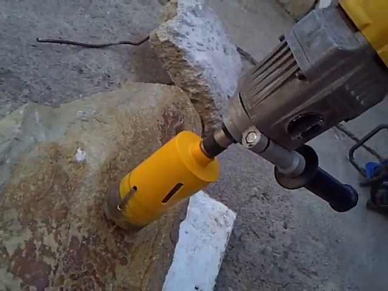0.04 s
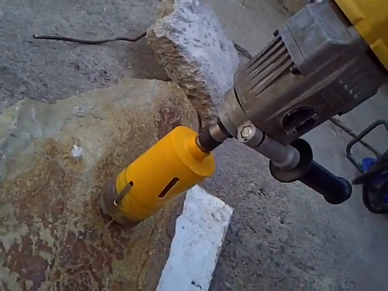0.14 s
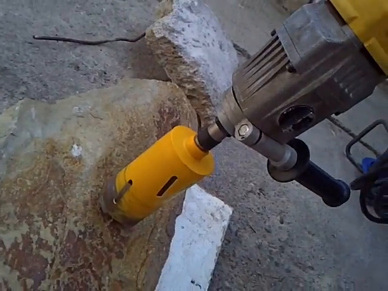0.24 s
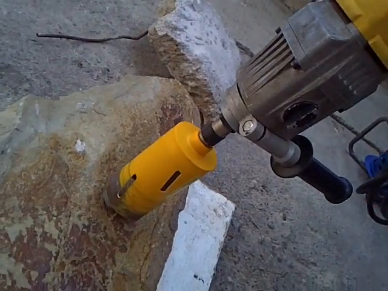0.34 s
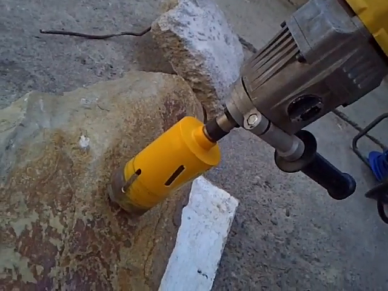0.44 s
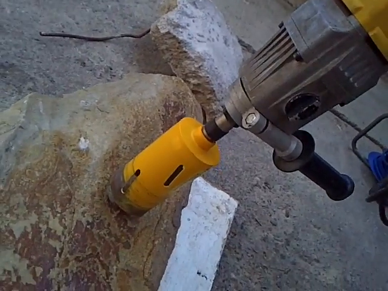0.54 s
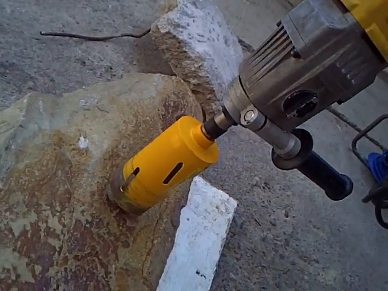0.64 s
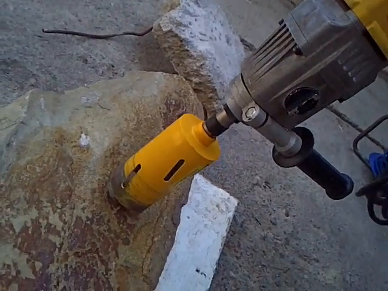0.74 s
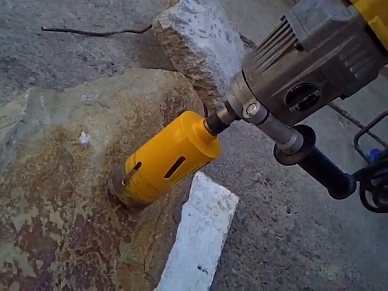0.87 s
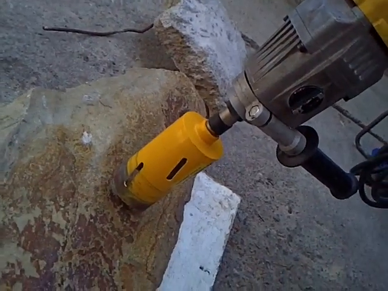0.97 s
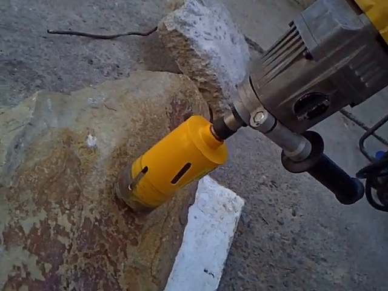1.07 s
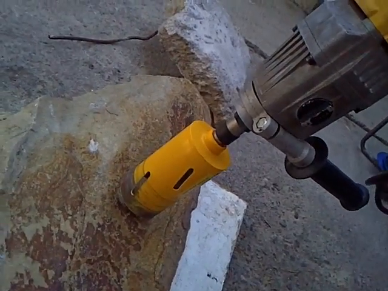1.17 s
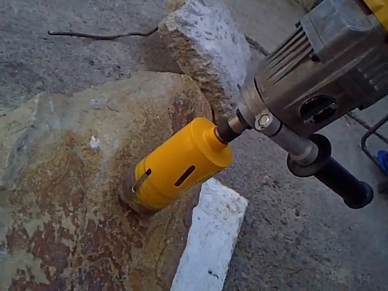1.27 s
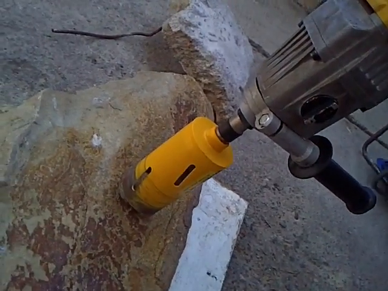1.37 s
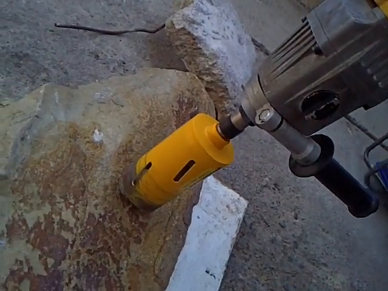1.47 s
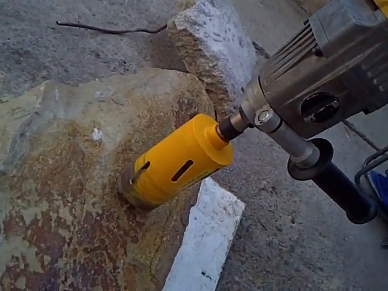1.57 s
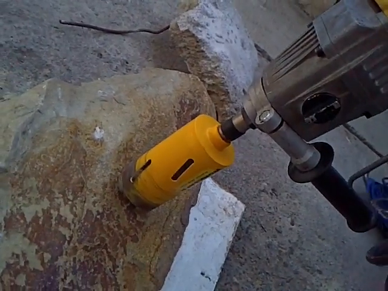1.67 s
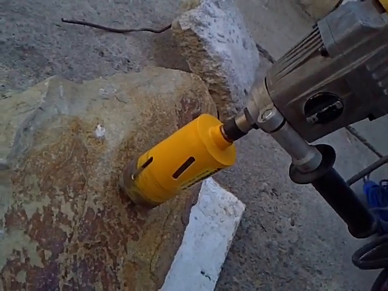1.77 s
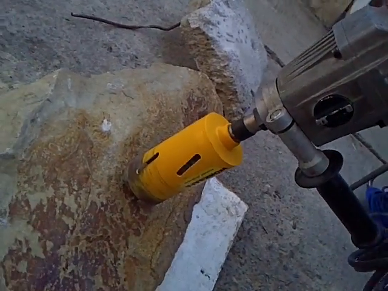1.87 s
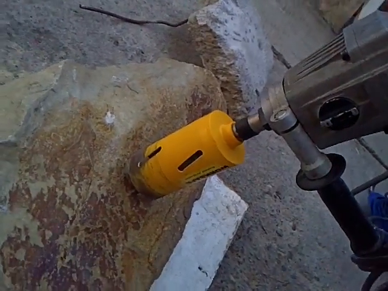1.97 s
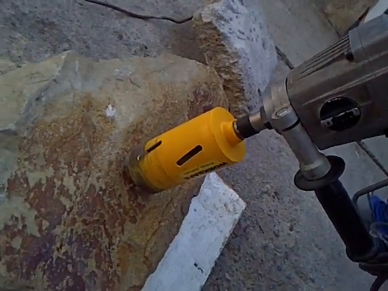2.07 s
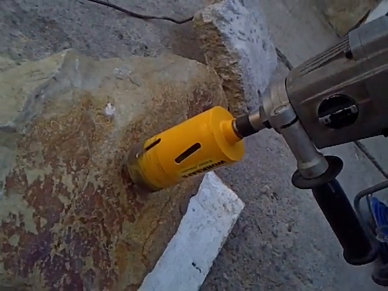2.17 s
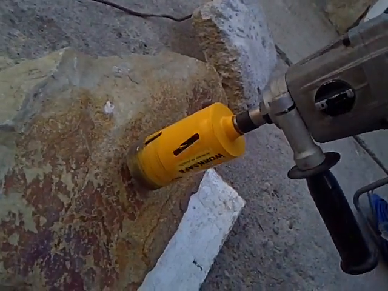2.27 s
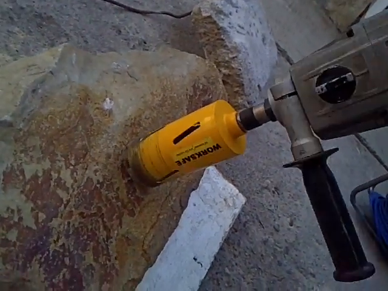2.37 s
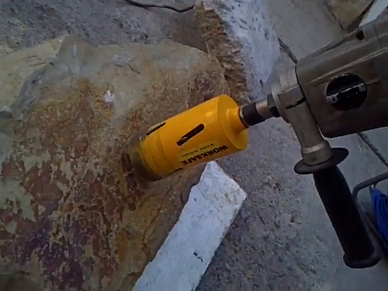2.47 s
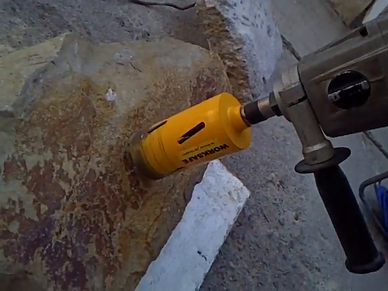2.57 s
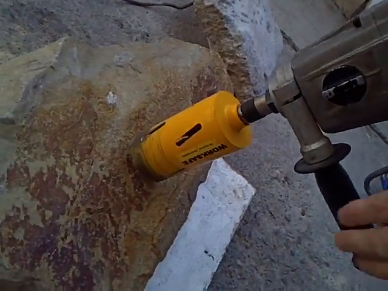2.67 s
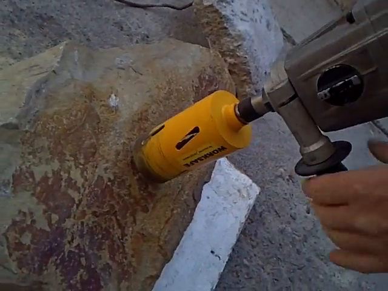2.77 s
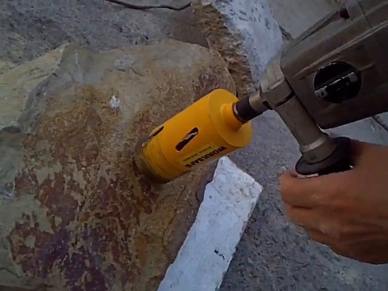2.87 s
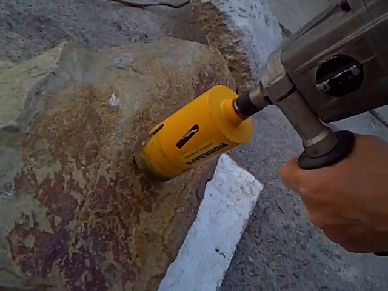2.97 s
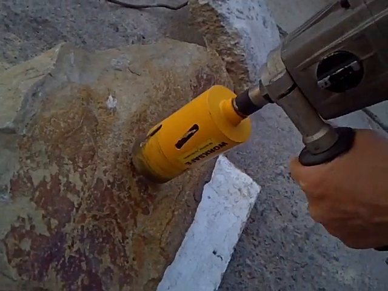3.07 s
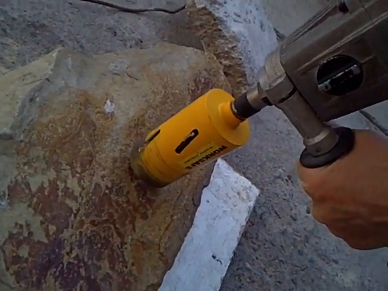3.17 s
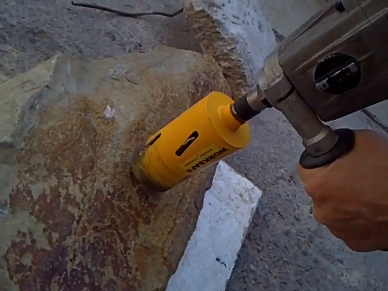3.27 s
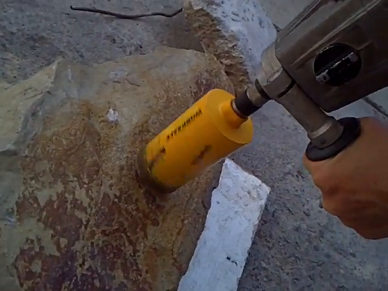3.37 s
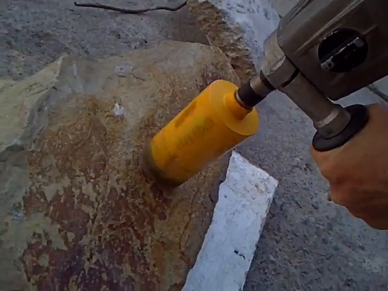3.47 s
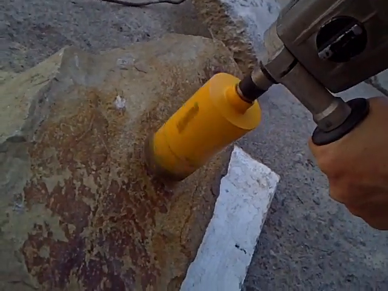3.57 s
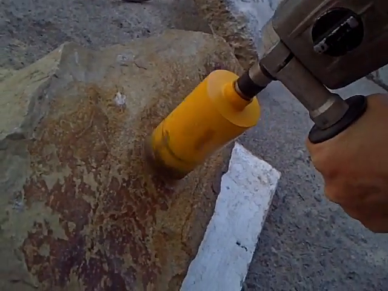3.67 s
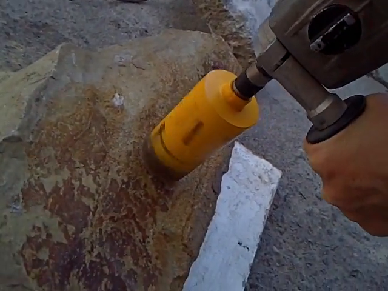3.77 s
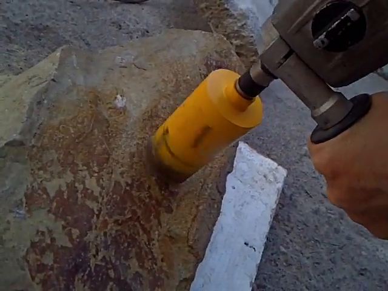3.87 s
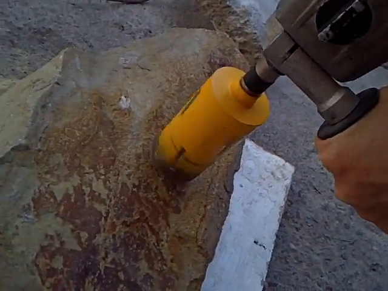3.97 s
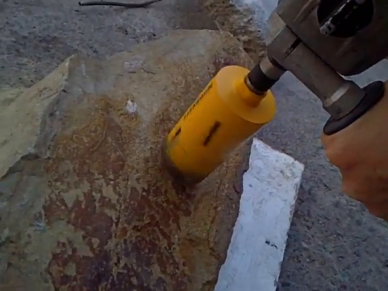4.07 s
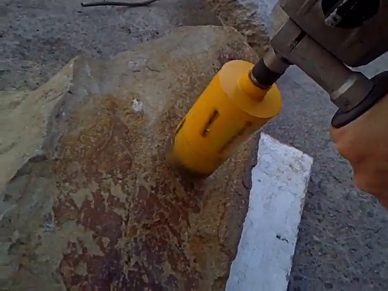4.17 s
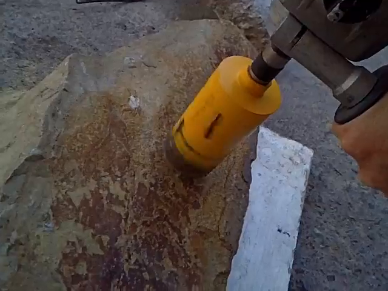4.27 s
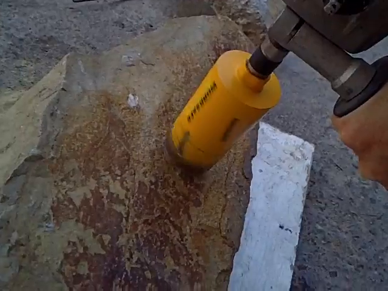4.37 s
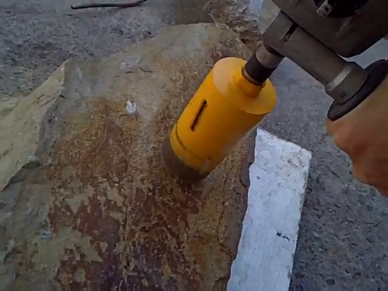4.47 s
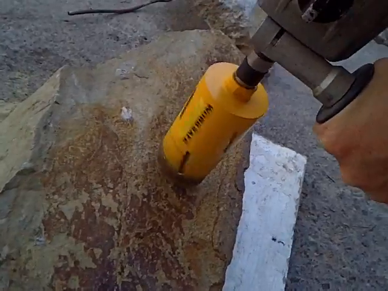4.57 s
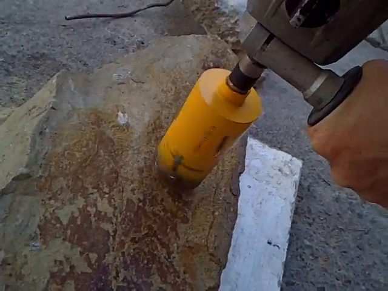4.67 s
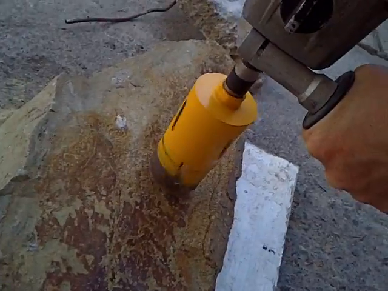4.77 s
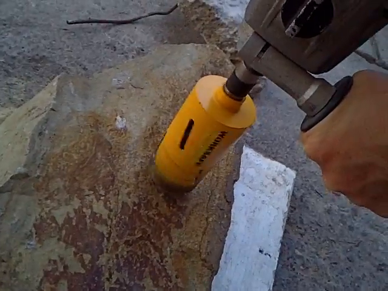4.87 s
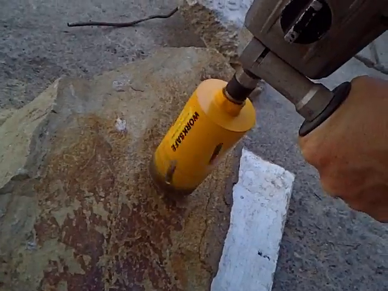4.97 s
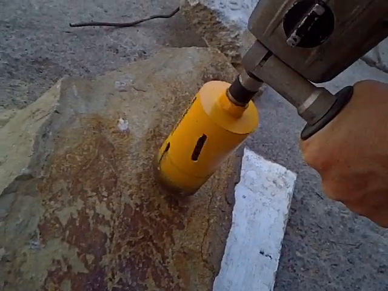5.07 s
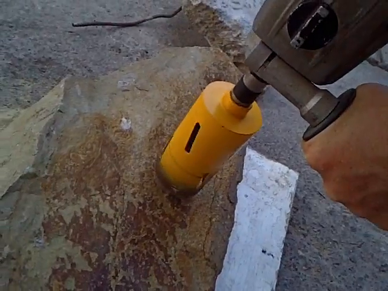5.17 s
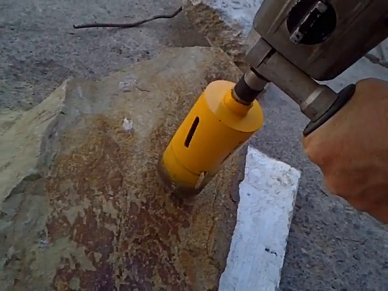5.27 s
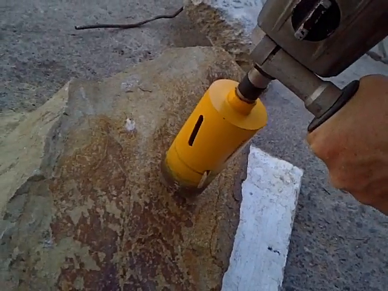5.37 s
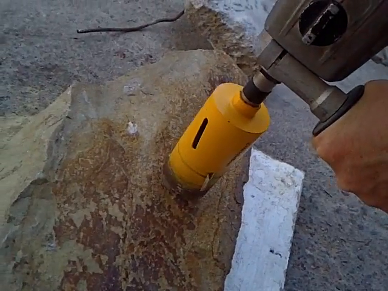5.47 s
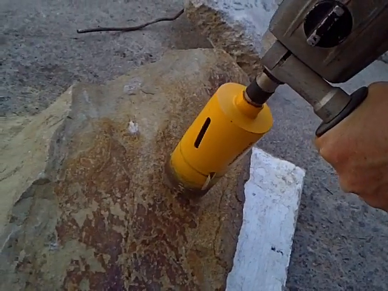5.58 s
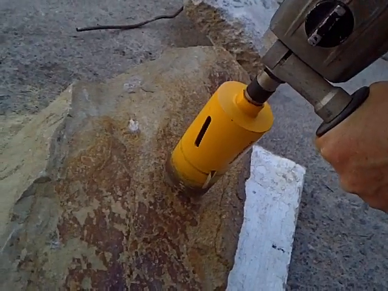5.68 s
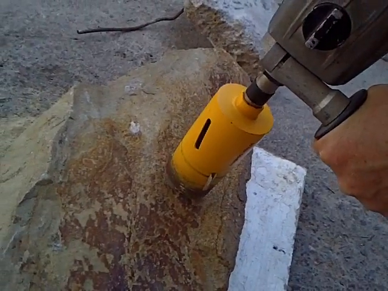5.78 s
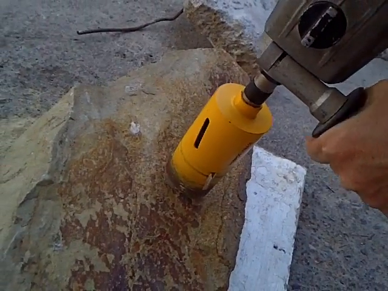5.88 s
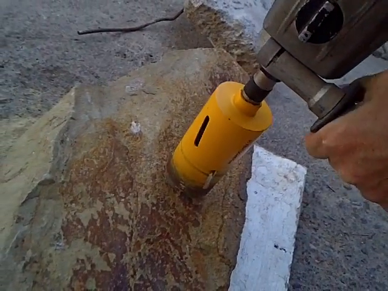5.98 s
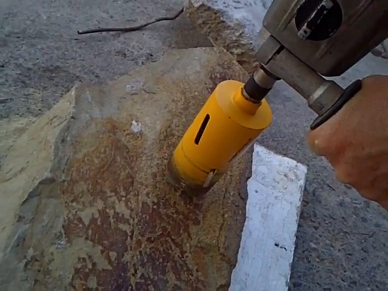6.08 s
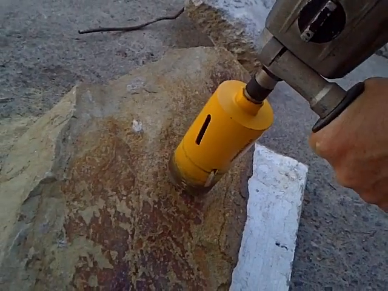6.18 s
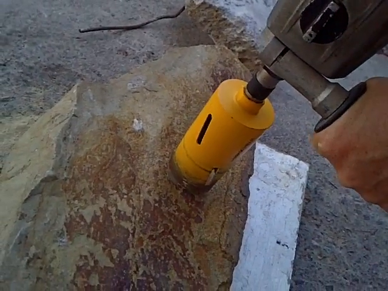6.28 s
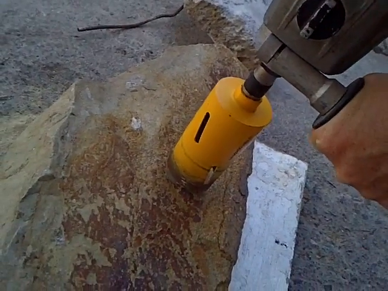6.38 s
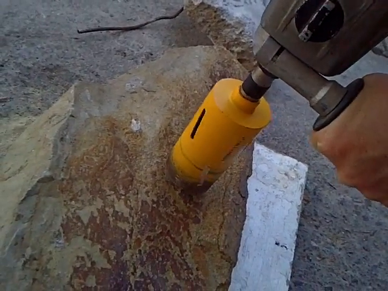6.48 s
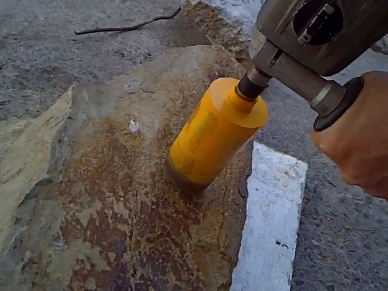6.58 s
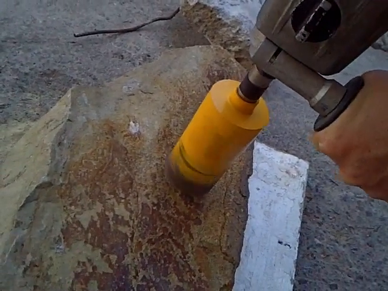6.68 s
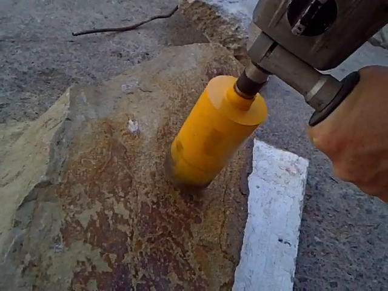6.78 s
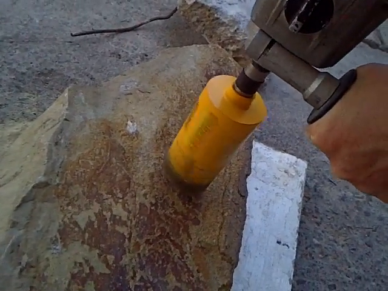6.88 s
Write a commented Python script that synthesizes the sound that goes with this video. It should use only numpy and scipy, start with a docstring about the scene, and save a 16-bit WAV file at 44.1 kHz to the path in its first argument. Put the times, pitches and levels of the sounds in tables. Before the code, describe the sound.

A soft outdoor hush lies behind close, dry sounds with short reflections from yard walls. Gritty scraping starts at once; from 0.25 to 0.4 seconds a heavy drill lands with a rapid cluster of dull, hollow knocks, with weaker thuds until about 1.1. From 1.3 the steel crown scrapes and ticks on stone; near 1.77 it gives a very loud, brief squawking judder and crunch that overloads the microphone. Small scrapes and ticks continue to 3.4. At 3.44 the motor kicks in with hard, buzzing pulses and races upward until 3.6, then coasts: chattering gears, a throbbing rattle and a wavering whine fall steadily, slowing into loose clacks around 4.9 to 5.15. Quiet air follows, with a very faint high whistle and tiny ticks. At 6.56 a second burst revs up slightly higher, released at 6.75, still whirring and falling at the end.

```python
"""A walled yard: a core drill is set on a boulder with dull knocks; its steel crown scrapes and judders on the stone.
Two trigger blips: mains half-waves kick the motor up to speed, then friction and drag slow it.
Gears rattle and throb once a shaft turn under a whine that falls with the rotor speed.
Grit noise, resonators and speed-locked sines make the sounds; the close microphone overloads on the peaks."""
import sys
import numpy as np
from scipy import signal
from scipy.fft import rfft, irfft, next_fast_len
from scipy.io import wavfile
from scipy.ndimage import uniform_filter1d

SR = 44100
rng = np.random.default_rng(int(sys.argv[2]) if len(sys.argv) > 2 else 0)


def pcm_store(signal):
    """Save signal as 16-bit PCM."""
    levels = np.round(np.clip(np.atleast_2d(signal), -1, 1) * 32767)
    wavfile.write(sys.argv[1], SR, levels.astype(np.int16).T)


N = 305613
T = np.arange(N) / SR
SIZE = next_fast_len(N + SR // 2) // 2 * 2
FREQ_HZ = np.maximum(np.fft.rfftfreq(SIZE, 1 / SR), 1)

# outdoor noise outline: f/Hz, relative level/dB
YARD_COLOUR = [(25, -33.5), (60, -16.5), (150, -6.5), (320, -7.5), (560, -7.5), (750, -10.5), (1200, -13.5),
               (2200, -16), (3500, -26.5), (4400, -21), (4900, -40.5), (7300, -38), (8500, -51),
               (15000, -65.5)]
# slow change of outdoor noise: t/s, relative level/dB
YARD_SWELL = [(0, 3), (2.1, 0), (3.4, 1.5), (5.5, -2.5), (6.2, 1)]
# faint distant whistle: t/s, level/dB
WHISTLE_LEVEL = [(0, -59), (3.4, -72), (5.4, -52.5), (5.9, -56.5), (6.5, -57.5)]
# dull knocks as the drill is shifted: t/s, peak level/dB, modes above 450 Hz against bass/dB
KNOCKS = [(0.254, -9, 4), (0.274, -10, -1), (0.291, -19, 3), (0.309, -16, 1), (0.333, -7.5, 3),
          (0.355, -19, -5), (0.39, -20, -3), (0.478, -32, -7), (0.605, -33, -4), (0.670, -17, 0),
          (0.704, -23, 0), (0.884, -26, -4), (1.11, -31, -7), (1.135, -30, -9)]
# body modes under a knock: f/Hz, width/Hz, relative level/dB
KNOCK_MODES = [(102, 27, -4.5), (155.5, 6.2, 12), (189, 17, 2.5), (245, 77, -4), (346.5, 16.6, 7.5),
               (385, 17, 0.5), (524, 26, 3), (650, 26, -6.5), (770, 92, -14), (1050, 51, -9),
               (1500, 1300, -22)]
# crown scrapes on stone: start t/s, length/s, level/dB, rumble against level/dB, relative grit/dB
SCRAPES = [(0.0, 0.28, -37.5, -24, -0.5), (0.127, 0.029, -35, -27, -26), (1.289, 0.017, -37.5, -5.5, -14),
           (1.392, 0.022, -52.5, 12.5, -24), (1.425, .022, -42.5, 5.5, -18), (1.48, 0.11, -42.5, 2, -8),
           (1.577, 0.23, -30.5, -3, -15), (1.592, 0.0094, -38.5, 9.5, -19), (1.795, 0.05, -38, 3.5, -29),
           (1.894, 0.046, -46.5, -1.5, -14), (2.123, 0.051, -38.5, -29, 1.5),
           (2.192, 0.085, -32.5, -6, -16), (2.291, 0.067, -36.5, -10, -5), (2.376, 0.21, -42.5, -4, -4.5),
           (2.648, 0.039, -33.5, -12, -12), (2.91, .05, -35, -12, -2.5), (3.071, .075, -42, -34, 8),
           (3.179, 0.024, -23.5, -32, 0.5), (3.25, .06, -46.5, -13, 7.5), (3.422, 0.018, -38, -24, -3),
           (6.534, 0.028, -35, -13, -13)]
# scrape outline: f/Hz, relative level/dB
SCRAPE_COLOUR = [(40, -49.5), (100, -24.5), (230, -2.5), (500, 3.5), (1050, -2.5), (2100, -7.5), (3200, -8),
                 (4200, -15.5), (4900, -35.5), (7500, -31.5), (9000, -49), (15000, -41)]
# rings of the steel crown on stone: f/Hz, width/Hz, relative level/dB
CROWN_MODES = [(279, 21, 2.5), (415, 19, 0), (530, 34, -30), (1025, 140, -5), (1155, 14, -1), (1480, 16, 6),
               (2050, 27, -11), (2230, 110, 1), (2770, 86, -4)]
# crown ticks on stone: t/s, relative peak level/dB, ring f/Hz
TICKS = [(0.151, -13.5, 1050), (0.827, -26, 1170), (1.299, -25, 2100), (1.565, -19, 751),
         (1.987, -28.5, 1570), (2.121, -30, 1460), (2.2, -20, 1780), (2.212, -15, 1520),
         (2.473, -22.5, 1430), (2.489, -19, 1050), (2.507, -12, 2280), (2.656, -25, 840),
         (2.909, -27.5, 950), (3.063, -23, 3360), (3.139, -25.5, 3200), (3.167, -25, 1400),
         (3.207, -13.5, 1740), (3.255, -24, 2160), (3.292, -22, 2250), (5.786, -37, 3330),
         (5.877, -44, 3300), (6.401, -33, 670)]
# crown slips and judders (one row): centre t/s, swell/s, nominal f/Hz, drive level/dB
JUDDER = (1.7702, .0027, 780, 3.5)
# trigger blips: first mains half-wave t/s, release t/s, first firing late by/s, speed reached f/Hz
BLIPS = [(3.4397, 3.625, .0017, 200), (6.558, 6.755, .003, 225)]
# gear load per blip: squeeze/s, kick/dB, rattle under power/dB, pinion song/dB, song speed f/Hz, spread/Hz
LOADS = [(.003, -15.5, -16, -6, 170, 19.6), (.06, -14, -6.5, -6, 145, 49)]
# hardest kicks, teeth slam across backlash: t/s, level/dB
SLAMS = [(3.4435, -18), (3.4525, -6), (3.4615, -13), (3.491, -12), (3.502, -8.5), (3.5425, -10),
         (3.552, -12), (6.573, -21), (6.582, -20)]
# gear train struck by a kick: f/Hz, width/Hz, relative level/dB
KICK_MODES = [(605, 79, 10), (1235, 220, 16.5), (1755, 87, 18.5), (3490, 60, 7.5), (5120, 60, -21)]
# gears clack over their backlash while stopping: t/s, peak level/dB
CLACKS = [(4.89, -13), (4.9, -13), (4.923, -10), (4.934, -9), (4.942, -14), (4.952, -12), (4.971, -13),
          (5.094, -18), (5.135, -20), (5.141, -15)]
# running drill outline: f/Hz, relative level/dB
HOUSING_COLOUR = [(30, -47), (65, -49.5), (100, -17.5), (210, -13), (430, -6.5), (800, 1.5), (2150, -3),
                  (2750, -9), (3900, -15.5), (4800, -40.5), (7500, -37.5), (8500, -56.5), (10000, -42.5),
                  (15000, -79.5)]
# rings of housing and crown: f/Hz, width/Hz, relative level/dB
HOUSING_RINGS = [(442.4, 10.5, 14), (737, 72, -10.5), (1178, 90, 1), (1361, 40, 6), (1820, 80, -13),
                 (2090, 350, 0), (3360, 40, 1.5), (5180, 59, 15), (7200, 890, 3)]
# whine of pinion, armature slots and commutator: multiple of rotor speed, relative level/dB
WHINE_LINES = [(3, -14.5), (7, -27.5), (11, -6.5), (12, -9), (19, -16.5), (23, -16), (24, -3), (30, -13),
               (36, -4), (42, -19), (43, -22), (48, -6), (60, -9)]

YARD_DB = -48
SCRAPE_ATTACK_S, SCRAPE_RELEASE_S = 0.0044, 0.021
LIGHT_SQUEEZE_DB = -24  # drive at first touch of the trigger
RUN_UP_LAG = 1.14  # above 1 the S-shaped run-up starts more slowly
# coasting: friction takes a steady toll on speed, air drag a share of it
FRICTION_HZ_PER_S, DRAG_PER_S = 64.5, .497
FREE_SPEED_HZ = 247  # pull fades towards this speed
# loose rattle: steady above the knee, a power of speed below
RATTLE_DB, RATTLE_KNEE_HZ, RATTLE_SLOPE = -13.5, 56.6, 1.94
TREBLE_DB, TREBLE_SLOPE = -9.5, 0.54  # treble against rattle at 160 Hz rotor speed; power of speed
LOOSE_DIP_DB, RECOVER_S = -5, 0.03  # loose rattle dips under power, recovers after release
# gear shaft off centre: mid rattle swells once a turn, most at high speed
WOBBLE_DB, WOBBLE_FULL_HZ = 5.2, 140
MIC_TOP_HZ = 15600


def undb(db):
    """Amplitude ratio from dB."""
    return 10 ** (np.asarray(db) / 20)


def unit(x):
    """Scale to rms 1."""
    return x / np.sqrt(np.mean(x ** 2))


def steady(x):
    """Hold the rms near 1 over a sixteenth of a second."""
    return x / np.sqrt(uniform_filter1d(x ** 2, SR // 16) + 1e-12)


def noise():
    """White noise, rms near 1."""
    return rng.standard_normal(N)


def walk(rate_hz):
    """Random points joined by straight lines, spread near 1."""
    return np.interp(T * rate_hz, np.arange(8192), rng.standard_normal(8192)) * 1.2


def curve(rows):
    """Level breakpoints joined by straight lines."""
    t_s, level_db = np.transpose(rows)
    return np.interp(T, t_s, level_db)


def gate(start_s, end_s, fade_s=0.0047):
    """One between two times, with short ramps outside them."""
    return np.clip(np.minimum(T - start_s, end_s - T) / fade_s + 1, 0, 1)


def stroke(start_s, length_s, attack_s, release_s):
    """Straight rise, hold, exponential fall."""
    rise = np.clip((T - start_s) / attack_s, 0, 1)
    return rise * np.exp(-np.maximum(T - start_s - length_s, 0) / release_s)


def beat(turns, decay_turns):
    """Sharp rise and decay once a turn."""
    return np.exp(-(turns % 1) / decay_turns)


def through(x, response):
    """Filter by a frequency response."""
    return irfft(rfft(x, SIZE) * response, SIZE)[:N]


def colour(points):
    """Minimum-phase response with the given f/Hz, level/dB outline."""
    hz, db = np.transpose(points)
    outline_db = np.interp(np.log(FREQ_HZ), np.log(hz), db)
    cepstrum = irfft(np.log(undb(outline_db)))
    causal = np.r_[cepstrum[0], 2 * cepstrum[1:SIZE // 2]]
    return np.exp(rfft(causal, SIZE))


def resonances(modes):
    """Response of parallel resonators: f/Hz, width/Hz, level/dB."""
    return sum(undb(db) / (1 + 1j * (FREQ_HZ ** 2 - hz ** 2) / (FREQ_HZ * width_hz))
               for hz, width_hz, db in modes)


def dull(hz):
    """Response of a soft contact, which passes little above a frequency."""
    return 1 / (1 + 1.2j * FREQ_HZ / hz - (FREQ_HZ / hz) ** 2) ** 2


def split(x, hz):
    """Parts below and above a frequency."""
    low = through(x, 1 / (1 + (FREQ_HZ / hz) ** 8))
    return low, x - low


def grains(rate_hz, spread_db):
    """Random micro-impacts of uneven size and sign, rms 1."""
    hits = rng.random(N) < rate_hz / SR
    sign = np.sign(noise())
    size = undb(spread_db * np.clip(noise(), -2, 2))
    return unit(hits * sign * size)


def contact(decay_s, crunch):
    """A blow, then a short crumble of small contacts."""
    t = T[:SR // 8]
    return (t == 0) + crunch * rng.standard_normal(len(t)) * np.exp(-t / decay_s)


def strike(push, ring):
    """Ring of a body under a push."""
    return signal.fftconvolve(push, ring[:SR // 3])


def add(out, t_s, sound, peak_db):
    """Place a sound at a given peak level."""
    i = int(t_s * SR)
    out[i:i + len(sound)] += (undb(peak_db) * sound / np.abs(sound).max())[:N - i]


def yard():
    """Distant outdoor noise, a faint wavering whistle and a thin high hiss."""
    low, high = split(unit(through(noise(), colour(YARD_COLOUR))), 900)
    air = low * undb(1.4 * walk(14)) + high * undb(.6 * walk(9))
    air *= undb(YARD_DB + curve(YARD_SWELL))
    whistle_cycles = np.cumsum(1022 + 3 * walk(35)) / SR
    whistle = np.sin(2 * np.pi * whistle_cycles) * undb(curve(WHISTLE_LEVEL) + 2 * walk(15))
    hiss = unit(through(noise(), resonances([(10000, 2200, 0)]) ** 3))
    return air + whistle + undb(-66.5) * hiss


def walls(x, t60_s, wet_db, echo_db):
    """Three slaps from the yard walls and a short decaying tail, lowpassed at 3 kHz."""
    t = T[:SR // 2]
    tail = rng.standard_normal(len(t)) * np.exp(-np.log(1000) * t / t60_s) * (t > .008)
    tail *= undb(wet_db) / np.sqrt(np.sum(tail ** 2))
    for lag_s in (.012, .028, .046):
        tail[int(lag_s * SR)] += undb(echo_db)
    return through(x, rfft(tail, SIZE) / (1 + 1j * FREQ_HZ / 3000))


def knocks():
    """Soft heavy blows ring the low modes; loose parts rattle on briefly."""
    out = np.zeros(N)
    # soft contact passes little treble; small body radiates no deep bass
    radiation = dull(1700) * (1j * FREQ_HZ / (60 + 1j * FREQ_HZ)) ** 3
    rings = []
    for k, mode in enumerate(KNOCK_MODES):
        # neighbours swing oppositely: the ring builds up without a click
        ring = (-1) ** k * irfft(resonances([mode]) * radiation)[:SR // 3]
        rings.append((mode[0], ring))
    for t_s, peak_db, upper_db in KNOCKS:
        ring = sum(r * undb(upper_db * (hz > 450)) for hz, r in rings)
        add(out, t_s, strike(contact(.014, .04), ring), peak_db)
    return out


def scraping():
    """Grit catches and breaks under the steel crown, which rings with it and ticks on the stone."""
    crown = colour(SCRAPE_COLOUR) * (.9 + resonances(CROWN_MODES))
    friction = (grains(1200, 4) + .7 * noise()) * undb(2 * walk(70))
    rumble, rest = split(through(friction, crown), 700)
    body, grit = split(rest, 2310)
    rumble, body, grit = unit(rumble), unit(body), unit(grit)
    out = np.zeros(N)
    for t_s, length_s, level_db, rumble_db, grit_db in SCRAPES:
        sound = undb(-2.0) * body + undb(rumble_db) * rumble + undb(grit_db - 8.5) * grit
        out += stroke(t_s, length_s, SCRAPE_ATTACK_S, SCRAPE_RELEASE_S) * undb(level_db) * sound
    ring = irfft(crown * FREQ_HZ / (FREQ_HZ + 700))
    for t_s, level_db, hz in TICKS:
        tick = strike(contact(0.0062, 0.098), ring)
        tick = tick + 4.9 * signal.lfilter(*signal.iirpeak(hz, 4, SR), tick)
        add(out, t_s, tick, level_db - 1.5)
    return out


def judder():
    """Stick-slip cycles swell and die as the crown skids and crunches; lopsided mic overload adds a low bump."""
    centre_s, swell_s, hz, drive_db = JUDDER
    t = T - centre_s
    swell = 1 / np.cosh(np.clip(t / swell_s, -20, 20))
    # slips come faster while the crown presses hardest
    cycles = np.cumsum(hz * (.85 + .18 * swell)) / SR
    squawk = np.sin(2 * np.pi * cycles) + .15 * np.sin(np.pi * cycles)
    overload_bump = .045 * swell  # one-sided
    crunch = unit(through(grains(1300, 3.2), colour(SCRAPE_COLOUR) * dull(2280)))
    skid = .09 * (t > 0) * np.exp(-np.abs(t) / .04)
    return undb(drive_db) * (swell * squawk + overload_bump + (0.25 * swell + skid) * crunch)


def rotor_speed():
    """Rotor speed/Hz: S-shaped run-up under power, then friction and air drag brake it."""
    speed_hz, brake_hz = np.zeros(N), FRICTION_HZ_PER_S / DRAG_PER_S
    for start_s, end_s, _, top_hz in BLIPS:
        progress = np.clip((T - start_s) / (end_s - start_s), 0, 1)
        run_up = top_hz * np.sin(np.pi / 2 * progress ** RUN_UP_LAG) ** 2
        coast = (top_hz + brake_hz) * np.exp(-DRAG_PER_S * (T - end_s)) - brake_hz
        speed_hz += np.where(T < end_s, run_up, np.maximum(coast, 0))
    return speed_hz + 1e-6


def motor_load(speed_hz):
    """Gains of kicks, driven rattle and pinion song: pull grows with squeeze, fades with speed."""
    kick, driven, song = np.zeros((3, N))
    fade = np.sqrt(np.clip(1 - (speed_hz / FREE_SPEED_HZ) ** 2, 0, 1))
    for (start_s, end_s, late_s, _), load in zip(BLIPS, LOADS):
        squeeze_s, kick_db, rattle_db, song_db, song_hz, spread_hz = load
        held = gate(start_s + late_s + .003, end_s)
        unsqueezed = np.exp(-np.maximum(T - start_s, 0) / squeeze_s)
        pull = held * fade * undb(LIGHT_SQUEEZE_DB * unsqueezed)
        kick += pull * undb(kick_db)
        driven += pull * undb(rattle_db)
        song += held * undb(song_db) / (1 + ((speed_hz - song_hz) / spread_hz) ** 4)
    return kick, driven, song


def motor_kicks(turns, kick_gain, song_gain):
    """Each mains half-wave slams the teeth together and makes the pinion sing."""
    kicks = np.zeros(N)
    for start_s, end_s, late_s, _ in BLIPS:
        times_s = np.arange(start_s, end_s, 1 / 100)
        # speed control fires earlier as the trigger is squeezed
        times_s = times_s + late_s * np.exp(-(times_s - start_s) / .03)
        kicks[(times_s * SR).astype(int)] = 1
    # torque swells and falls within each half-wave; teeth grind while it lasts
    surge = signal.fftconvolve(kicks, np.hanning(SR // 260))[:N]
    gear_train = resonances(KICK_MODES) * dull(3200) * (1j * FREQ_HZ / (120 + 1j * FREQ_HZ))
    slam = through(surge * np.sign(noise()), gear_train)
    slam = slam / np.sqrt(uniform_filter1d(slam ** 2, SR // 100) + 1e-4)  # evened over 10 ms
    hardest = sum(undb(db) * gate(t_s - .002, t_s + .002) for t_s, db in SLAMS)
    song = signal.fftconvolve(kicks, np.hanning(SR // 170))[:N]
    song = np.roll(song, -SR // 500)  # 2 ms earlier
    mesh = 2.2 * song * np.sin(2 * np.pi * round(WHINE_LINES[2][0]) * turns)
    return slam * np.hypot(kick_gain, hardest) + mesh * song_gain


def housing():
    """Response of gear case and crown."""
    return colour(HOUSING_COLOUR) * (0.88 + resonances(HOUSING_RINGS))


def rattle(speed_hz, turns):
    """Gears chatter in the housing; returns body and treble, each at a steady level."""
    shaft = turns * 11 / 30
    # gear shaft knocks once a turn, and again four and eight times a turn
    load = .55 + .5 * beat(shaft, .2) + .7 * beat(4 * shaft, .25) + .6 * beat(8 * shaft, .22)
    chatter = load * (grains(5000, 2) + .6 * noise())
    body, treble = split(through(chatter, housing()), 2235)
    low, middle = split(body, 950)
    wobble_db = WOBBLE_DB * np.minimum(speed_hz / WOBBLE_FULL_HZ, 1)
    swell_db = wobble_db * np.cos(2 * np.pi * (shaft - .1)) + 1.2 * walk(120)
    body = low + middle * steady(undb(swell_db))
    return steady(body), steady(treble)


def whine(speed_hz, turns):
    """Wavering lines on rotor-speed multiples, each weighted by the housing outline at its pitch."""
    hz, outline_db = np.transpose(HOUSING_COLOUR)
    lines = np.zeros(N)
    for multiple, db in WHINE_LINES:
        level_db = db + np.interp(multiple * speed_hz, hz, outline_db) + 2.6 * walk(60)
        lines += undb(level_db) * np.sin(2 * np.pi * round(multiple) * turns)
    return lines * np.sqrt(2) * (speed_hz / 160) ** 1.06


def drill():
    """Rotor speed drives rattle and whine; power adds a driven rattle while the loose rattle dips."""
    speed_hz = rotor_speed()
    turns = np.cumsum(speed_hz * (1 + .002 * walk(40))) / SR
    kick, driven, song = motor_load(speed_hz)
    body, treble = rattle(speed_hz, turns)
    powered = sum(stroke(start_s, end_s - start_s, .01, RECOVER_S) for start_s, end_s, *_ in BLIPS)
    loose = undb(RATTLE_DB + LOOSE_DIP_DB * powered)
    loose = loose / np.hypot(1, (RATTLE_KNEE_HZ / speed_hz) ** RATTLE_SLOPE)
    bright = undb(TREBLE_DB) * (speed_hz / 160) ** TREBLE_SLOPE
    # the loose treble dips far less than the loose body
    treble_gain = np.hypot(loose * bright * undb(4.5 * powered), driven * undb(-14))
    out = np.hypot(loose, driven) * (undb(-1.76) * body + undb(-2) * whine(speed_hz, turns))
    out += treble_gain * treble
    out += motor_kicks(turns, kick, song)
    ring = irfft(housing() * dull(4000))
    for t_s, peak_db in CLACKS:
        add(out, t_s, strike(contact(0.0012, 0.57), ring), peak_db)
    return out


def scene():
    """Near sounds, their return from the walls, and the yard behind."""
    near = knocks() + scraping() + judder() + drill()
    return (yard() + walls(near, t60_s=.28, wet_db=-14, echo_db=-21) + near)[None]


def record(dry):
    """The microphone flattens the highest peaks and cuts the top."""
    clipped = dry / (1 + np.abs(dry) ** 20) ** (1 / 20)
    return signal.sosfilt(signal.ellip(8, .2, 70, MIC_TOP_HZ, fs=SR, output="sos"), clipped)


dry = scene()
out = record(dry)
pcm_store(out)
```